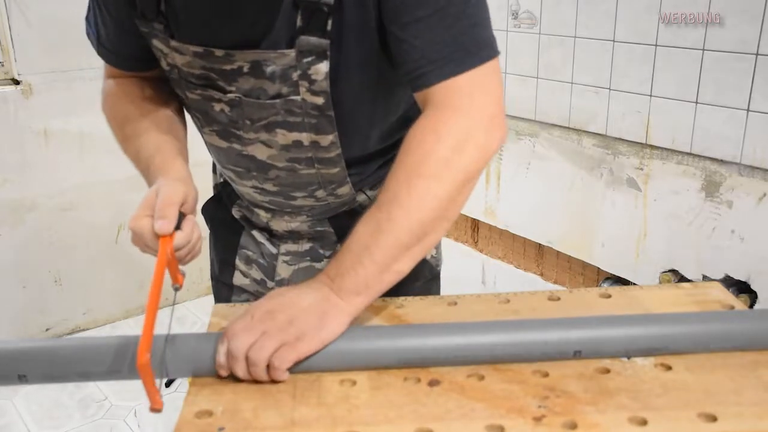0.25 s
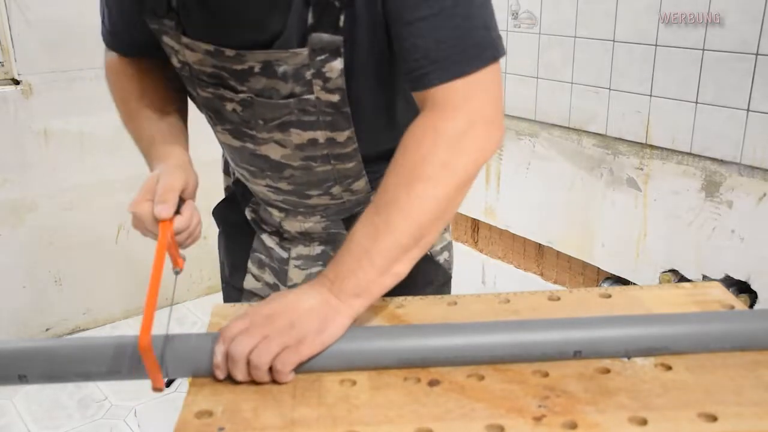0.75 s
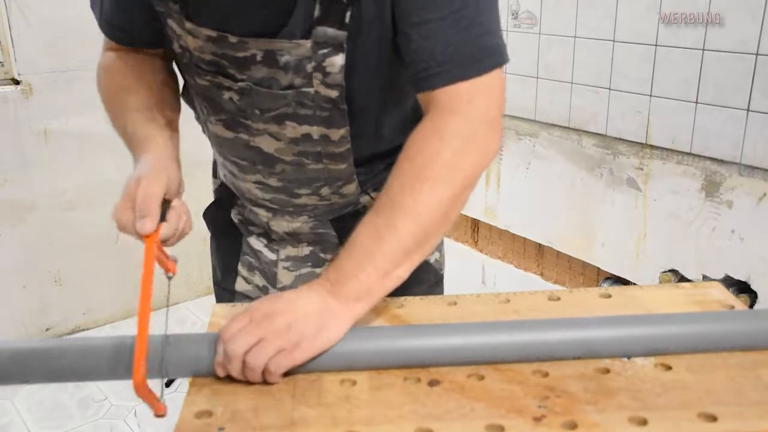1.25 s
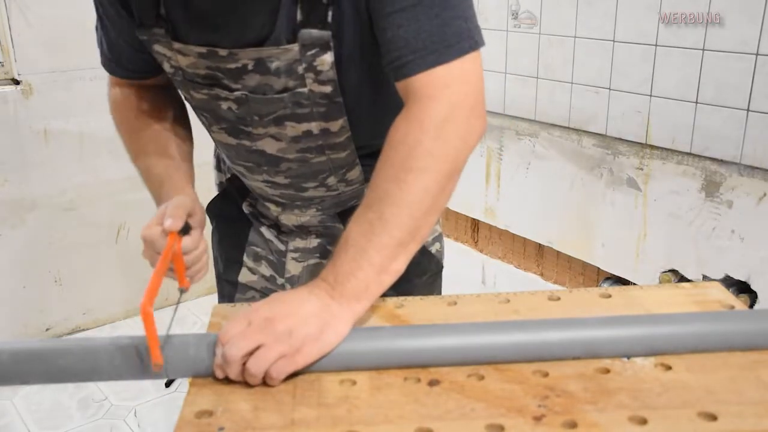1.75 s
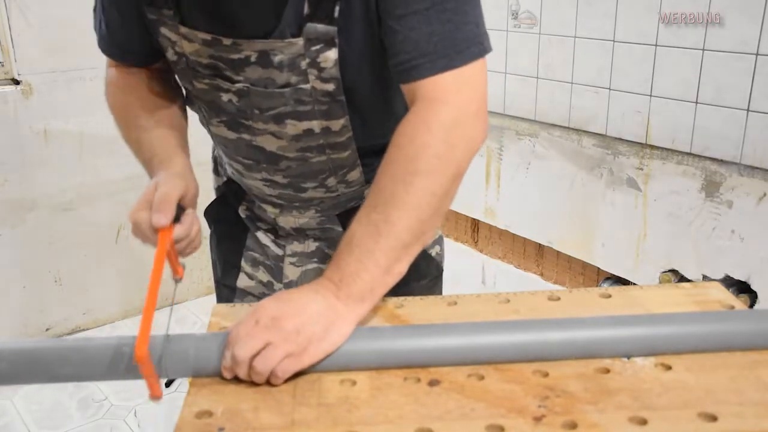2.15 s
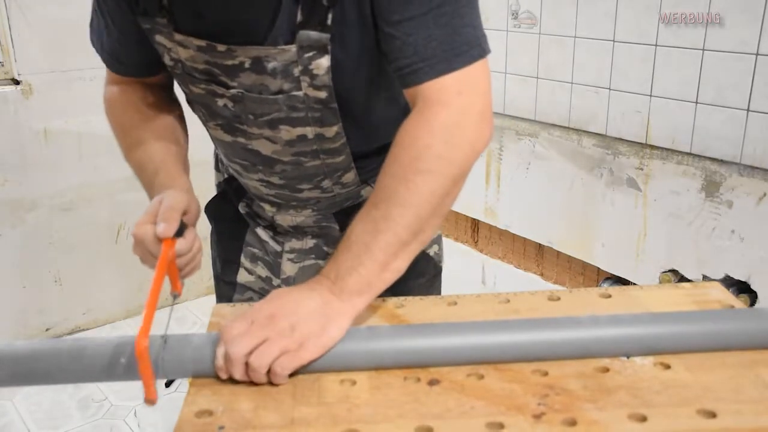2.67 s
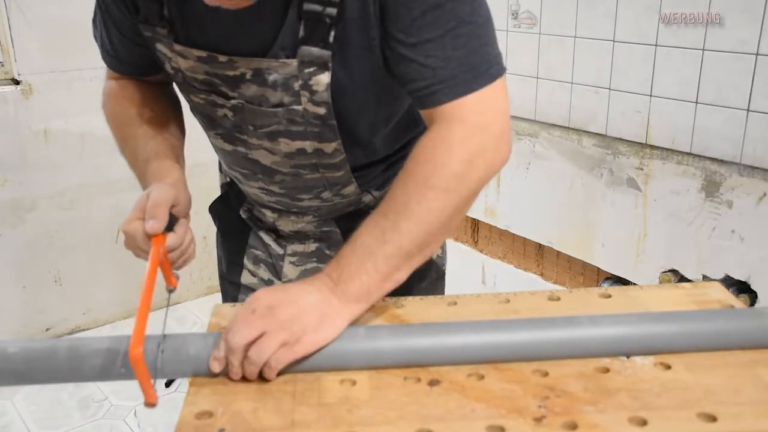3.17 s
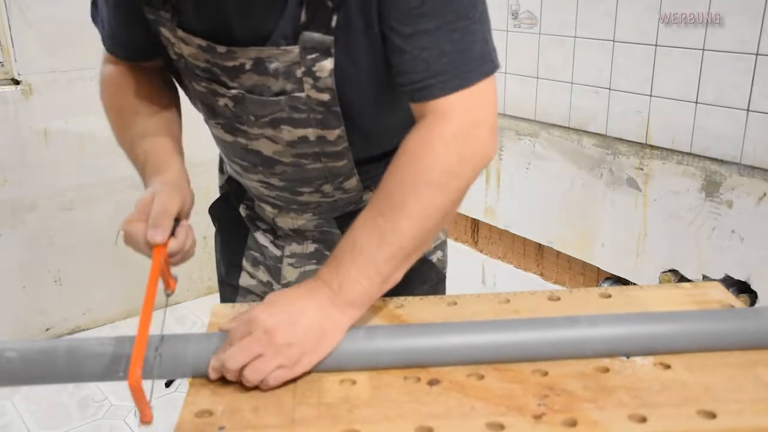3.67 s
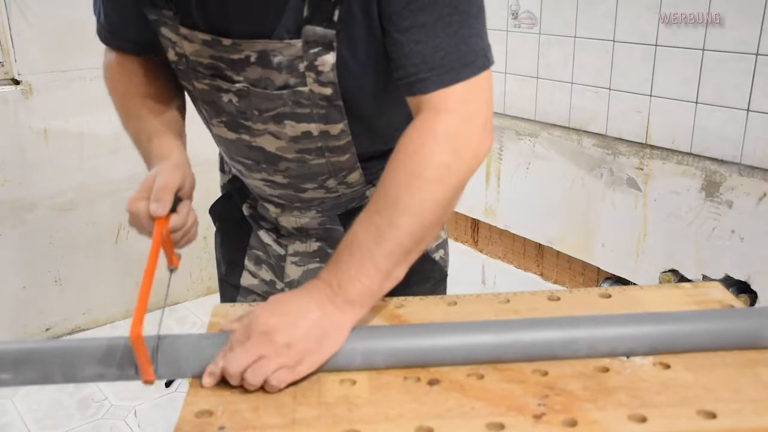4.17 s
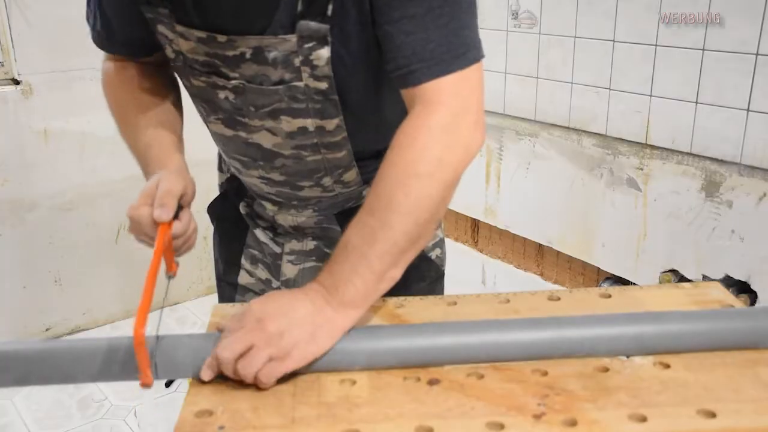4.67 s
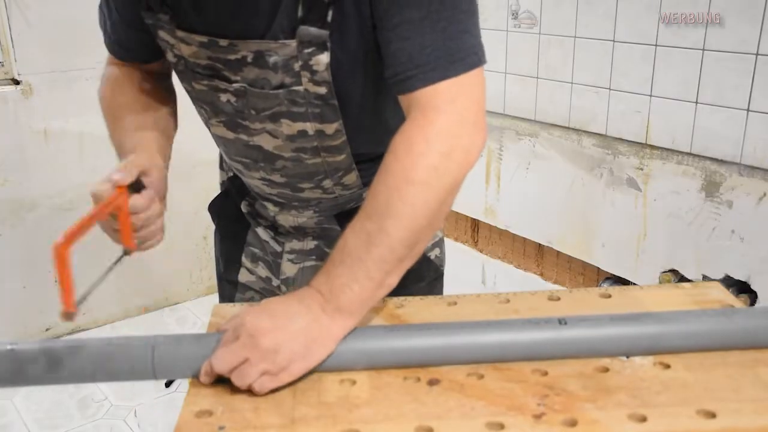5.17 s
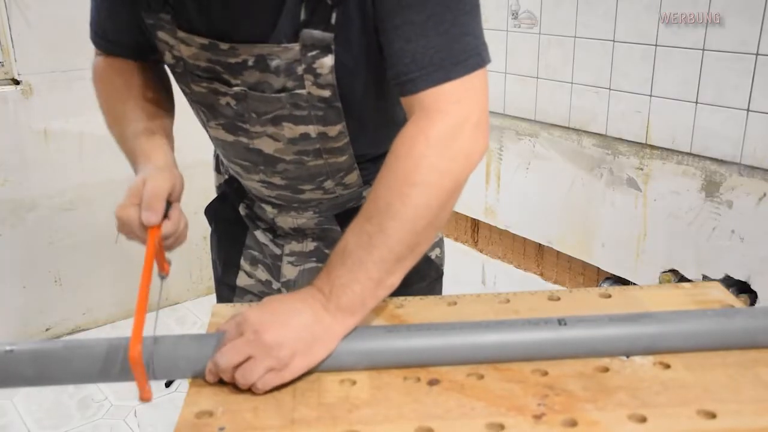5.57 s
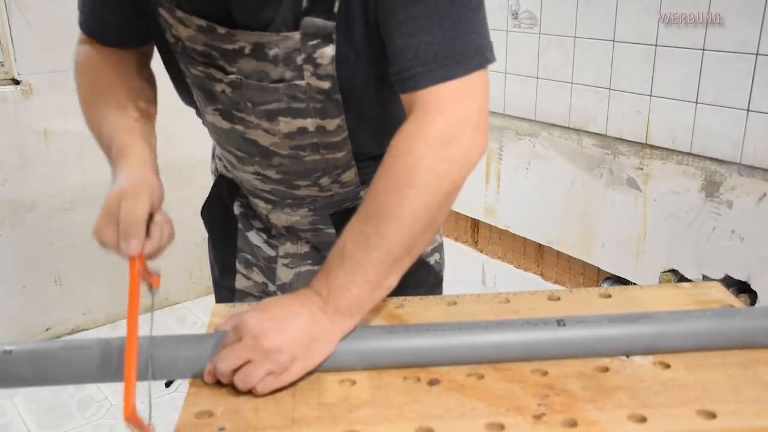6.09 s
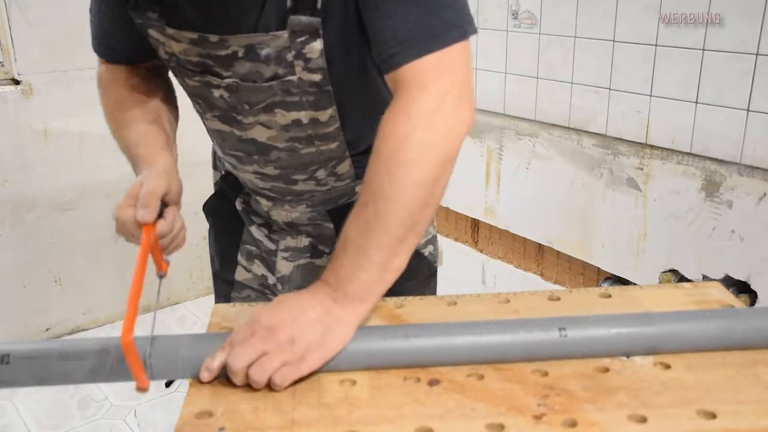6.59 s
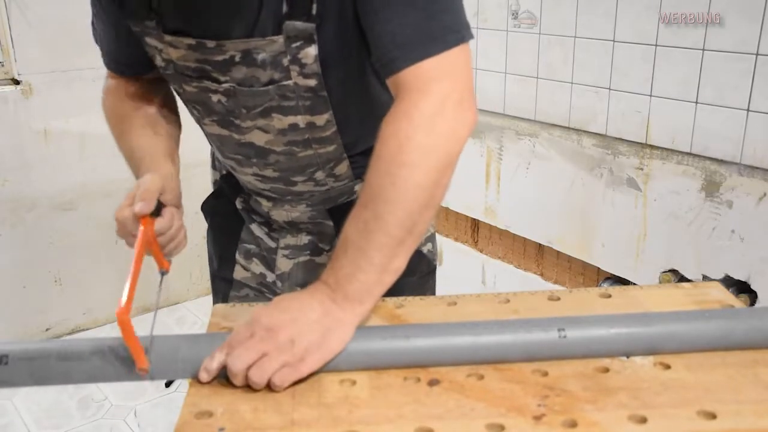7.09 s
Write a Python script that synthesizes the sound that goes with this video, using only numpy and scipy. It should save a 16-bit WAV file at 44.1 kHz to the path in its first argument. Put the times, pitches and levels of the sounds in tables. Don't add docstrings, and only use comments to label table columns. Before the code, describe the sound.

A hand hacksaw rasps in very fast, buzzing strokes through a hollow plastic pipe, with dull knocks, sharp ticks and brief pauses in a tiled room.

```python
import sys
import numpy as np
from scipy import signal
from scipy.fft import rfft, irfft, next_fast_len
from scipy.io import wavfile
from scipy.ndimage import uniform_filter1d

SR = 44100
rng = np.random.default_rng(int(sys.argv[2]) if len(sys.argv) > 2 else 0)


def how_loud(loudness_db):
    steps = np.asarray(loudness_db, float) / 20
    return 10 ** steps


def generate_wav(signal):
    frames = np.transpose(np.atleast_2d(signal))
    scaled = np.clip(frames, -1, 1) * 32767
    pcm = np.round(scaled).astype(np.int16)
    wavfile.write(sys.argv[1], SR, pcm)


N = 323694
TIME = np.arange(N) / SR


def level(x, db):
    return x * how_loud(db) / np.sqrt(np.mean(x ** 2))


def colour(x, points):
    hz, db = np.transpose(points)
    size = next_fast_len(N)
    axis_hz = np.arange(1, size // 2 + 2) * SR / size
    gain = how_loud(np.interp(np.log(axis_hz), np.log(hz), db))
    return irfft(rfft(x, size) * gain, size)[:N]


def flicker(rate, spread_db):
    targets = np.clip(rng.standard_normal(N // 100), -3, 1.5)
    return how_loud(spread_db * np.interp(TIME * rate, np.arange(N // 100), targets))


def ring(x, modes, patchy_db):
    out = np.zeros(N)
    for hz, width, db in modes:
        b, a = signal.iirpeak(hz, hz / width, SR)
        out += how_loud(db) * signal.lfilter(b, a, x * flicker(35, patchy_db))
    return out


def add(out, s, sound):
    i = int(s * SR)
    out[i:i + len(sound)] += sound[:N - i]


# frequency in Hz, density in dB per Hz.
ROOM_HISS = [(59, -59), (100, -30), (260, 5), (397, 0), (927, 0), (1220, -6), (1540, -2.5), (2260, -3),
             (2620, -3), (15900, -15)]
# frequency in Hz, rms level in dB.
HUM_LINES = [(398.4, -78.5), (1200, -82.5)]


def workshop():
    hum = sum(np.sqrt(2) * how_loud(db) * np.sin(2 * np.pi * hz * TIME) for hz, db in HUM_LINES)
    return level(colour(rng.standard_normal(N), ROOM_HISS), -70) + hum


# first bite in seconds, last bite in seconds, strokes per second.
STROKE_RUNS = [(0.011, 0.227, 27.78), (0.635, 0.878, 26.8), (0.894, 1.092, 27.88), (1.414, 1.567, 29.44),
               (1.582, 1.702, 29.24), (1.769, 1.91, 28.42), (2.15, 2.339, 26.58), (2.354, 2.589, 27.72),
               (2.661, 2.891, 28.26), (2.907, 3.08, 28.84), (3.34, 3.63, 27.56), (3.651, 3.945, 28.92),
               (4.002, 4.193, 28.78), (4.209, 4.382, 28.98), (4.472, 4.729, 29.2), (4.801, 4.991, 28.88),
               (5.038, 5.22, 27.44), (5.411, 5.641, 26.08), (5.658, 5.881, 26.82), (5.904, 6.189, 28.14),
               (6.207, 6.311, 28.94), (6.329, 6.458, 27.08), (6.587, 6.855, 27.96), (6.872, 7.156, 28.22)]
# peak in dB, every second bite in dB, swell from first to last bite in dB.
RUN_EFFORT = [(-35, -4.5, -2.5), (-37.5, -3.5, -0.5), (-39, 1, 2), (-37.5, -3, 1), (-38, 1.5, 1),
              (-38.5, 4.5, -3.5), (-39.5, -0.5, 4), (-39.5, 1.5, -1), (-39.5, -1.5, 3), (-37, -5, -0.5),
              (-37.5, 4.5, 1.5), (-35, -1, 3.5), (-34, -5, 3), (-35.5, -1.5, -1), (-36.5, -1.5, 3.5),
              (-36, 0, 2), (-35, -3, 3.5), (-34.5, -2, -1), (-37, 2, -1.5), (-35.5, -1, 5), (-35.5, 4.5, 2),
              (-34, -1.5, -5), (-33, -5.5, -4), (-34.5, -1, 0.5)]
# time of the peak in
# seconds, peak in dB, brightness in dB.
LONE_STROKES = [(0.261, -33.5, 3), (0.297, -49, 3), (0.343, -58, 9), (0.599, -50, -6), (1.156, -52, 4),
                (1.182, -58, 5), (1.352, -50.5, 4), (1.381, -50, -3), (1.737, -40.5, -6),
                (1.753, -38.5, -6), (1.925, -43.5, 1), (1.949, -43.5, -25), (2.613, -52, -7),
                (3.157, -46.5, 7.5), (3.273, -60, -7), (3.288, -43, -14), (3.303, -49.5, -11),
                (3.316, -40, -10), (4.45, -38, -15), (4.748, -45, -3), (5.39, -42.5, -9), (6.478, -41, -9),
                (6.515, -50.5, 10.5), (6.561, -35, -36), (7.218, -55, 0), (7.254, -42.5, -15),
                (7.286, -55.5, 2.5)]
# time of the peak in seconds, peak in dB,
# brightness in dB.
MORE_LONE_STROKES = [(0.249, -38.5, -13), (0.405, -64, 11), (.53, -71, -5), (.56, -60.5, -13), (1.131, -58, 11),
                     (1.25, -73, 12), (1.325, -66.5, -10), (1.993, -72, 0), (2.13, -55.5, -12), (2.632, -55, -8),
                     (3.126, -51.5, -7), (3.205, -59.5, 2), (3.236, -62.5, -3), (3.983, -46.5, -7),
                     (4.405, -52, 5), (4.428, -50, -4), (4.776, -52, -11), (5.015, -39.5, -26),
                     (5.25, -55.5, -4), (5.313, -74, 11), (6.5, -59, 3), (6.538, -60, 1), (7.181, -56, -2),
                     (7.333, -63, 0)]
PAUSE_S = 0.03
EASE_IN_DB, EASE_IN_S = -4, 0.016
EASE_OUT_DB, EASE_OUT_S = -3, 0.024
SCATTER_DB, SCATTER_S = 0.9, 0.0008


def strokes():
    rows = [np.array(LONE_STROKES), np.array(MORE_LONE_STROKES)]
    for n, (run, effort) in enumerate(zip(STROKE_RUNS, RUN_EFFORT)):
        first, last, hz = run
        peak_db, second_db, swell_db = effort
        k = np.arange(round((last - first) * 2 * hz) + 1)
        s = first + k / (2 * hz)
        starts = n > 0 and first - STROKE_RUNS[n - 1][1] > PAUSE_S
        stops = n == len(STROKE_RUNS) - 1 or STROKE_RUNS[n + 1][0] - last > PAUSE_S
        ease_db = starts * EASE_IN_DB * np.exp((first - s) / EASE_IN_S)
        ease_db = ease_db + stops * EASE_OUT_DB * np.exp((s - last) / EASE_OUT_S)
        late, hard = rng.standard_normal((2, 40))[:, k]
        db = peak_db + second_db * (k % 2) + swell_db * (k / k[-1] - 0.5)
        db = db + ease_db + SCATTER_DB * hard
        rows.append(np.transpose([s + SCATTER_S * late, db, 0 * s]))
    rows = np.concatenate(rows)
    return rows[np.argsort(rows[:, 0])].T


def bites(s, db, reach, longest_s, fullness):
    gaps = np.minimum(reach * np.diff(s, prepend=-1, append=99), longest_s)
    power = np.zeros(N)
    for at, peak_db, rise, fall in zip(s, db, 0.98 * gaps[:-1], gaps[1:]):
        span = slice(max(int((at - rise) * SR), 0), int((at + fall) * SR))
        t = TIME[span]
        away = np.where(t < at, (at - t) / rise, (t - at) / fall)
        power[span] += how_loud(2 * peak_db) * np.clip(np.cos(away * np.pi / 2), 0, 1) ** fullness
    return np.sqrt(power)


def teeth(per_s, spread_db):
    hit = rng.random(N) < per_s / SR
    hardness = np.minimum(rng.exponential(size=N), 3)
    return level(hit * rng.standard_normal(N) * how_loud(spread_db * hardness), 0)


def part(shape, push, per_s, spread_db):
    sound = shape(teeth(per_s, spread_db) * push)
    return sound * np.std(push) / np.std(sound)


# frequency in Hz, density in dB per Hz.
RASP_COLOUR = [(400, -14), (600, -4), (1280, -8.5), (2200, -5.5), (3000, -8.5), (4000, -8), (5500, -11.5),
               (7500, -7.5), (9500, -24), (16000, -22)]


def scrape(body, bright_db):
    rasp = part(lambda x: colour(x, RASP_COLOUR), body * flicker(60, 1), per_s=30000, spread_db=1)
    dull = signal.lfilter(*signal.butter(2, 3800, fs=SR), rasp)
    return dull + how_loud(0.27 * bright_db) * (rasp - dull)


# frequency in Hz, density in dB per Hz.
SIZZLE_COLOUR = [(5000, -69), (7500, -1), (9000, -9), (10300, 1.5), (12200, 2), (14000, 3.5), (15700, -1.5)]
# frequency in Hz, width in Hz, level in dB.
SHALLOW_MODES = [(5750, 1800, -2), (6210, 150, 0), (6540, 150, 2.5), (7630, 28, 2), (8400, 140, 2.5)]
# frequency in Hz, width in Hz, level in dB.
DEEP_MODES = [(9700, 120, -1), (10060, 70, 0), (10270, 90, 0), (10500, 120, -1), (10800, 70, -1),
              (11300, 100, -2), (11960, 130, 0), (12150, 110, 0), (12400, 200, -2), (13650, 70, -4),
              (14200, 200, -7)]


def blade(force, body, blade_db, bright_db, slack_db, deep):
    sharp = force * (force / np.std(force)) ** 0.2
    sizzle = part(lambda x: colour(x, SIZZLE_COLOUR), sharp * flicker(60, 1), per_s=30000, spread_db=1)
    shallow = part(lambda x: ring(x, SHALLOW_MODES, 2.2), body, per_s=20000, spread_db=1)
    buried = part(lambda x: ring(x, DEEP_MODES, 1.5), force, per_s=20000, spread_db=1)
    high_db = -1.14 + blade_db + bright_db - 0.16 * slack_db
    high = how_loud(high_db) * (how_loud(-4.5) * sizzle + how_loud(-1.5) * buried)
    return high + how_loud(bright_db - 1.5) * (1 - deep) * shallow


# frequency in Hz, width in Hz, level in dB.
FRAME_MODES = [(1650, 70, -9), (1724, 40, 0), (1780, 35, -4), (2085, 70, -8), (2280, 150, -12),
               (4505, 55, -6)]


def frame(body, frame_db, deep):
    lower = part(lambda x: ring(x, FRAME_MODES[:3], 2.2), body, per_s=8000, spread_db=1.5)
    upper = part(lambda x: ring(x, FRAME_MODES[3:], 2.2), body, per_s=8000, spread_db=1.5)
    lower_db = 1 + frame_db - 2.5 * deep
    upper_db = -2 + 1.31 * frame_db + 5 * deep
    return how_loud(lower_db) * lower + how_loud(upper_db) * upper


# frequency in Hz, width in Hz, level in dB.
PIPE_MODES = [(212, 54, -3), (293.4, 61, -0.5), (374, 250, 5.5), (447, 95, -10), (840, 1130, 0.5)]
BOOM_COLOUR = [(110, -0.5), (200, -3.5), (1000, -7), (2500, -8)]  # Hz, dB


def pipe(force, pipe_db, slack_db):
    push = signal.lfilter([0.004], [1, 0.004 - 1], force)
    boom = part(lambda x: colour(ring(x, PIPE_MODES, 3.5), BOOM_COLOUR), push, per_s=1400, spread_db=0.8)
    return how_loud(-2.5 + pipe_db + 0.44 * slack_db) * boom


# time in seconds, freedom of the pipe under the hand in dB,
# of the frame in the grip in dB, of the blade in the slot in dB, depth of the cut from 0 to 1.
CUT_PROGRESS = [(0.1, -3, -10, -2, 0.48), (.7, 2, -5.5, -0.5, 0.64), (1.0, -4, -7, -0.5, 0.28),
                (1.45, 2.5, -2.5, 1, 0.67), (1.85, -3.5, -8.5, -0.5, 0.12), (2.4, -2.5, -4, 3, .15),
                (2.75, 4, -6.5, 0.5, 0.27), (3.05, -1.5, -7, 2, 0.27), (3.35, 3, -7.5, -7.5, 0.9),
                (3.6, -6, -4, -0.5, 0.47), (3.9, -1, -10.5, 2.5, 0.47), (4.2, -0.5, -7, 1.5, 0.4),
                (4.9, -1, -11, 1.5, 0.2), (5.6, -2.5, -8.5, 2.5, 0.15), (6.0, 4, -4.5, 1.5, 0),
                (6.3, -4, -4, -2, 0.27), (6.65, 1.5, -8, 1, 0.17), (7.1, -2, -11, 2, 0)]


def saw():
    s, *columns = np.transpose(CUT_PROGRESS)
    pipe_db, frame_db, blade_db, deep = (np.interp(TIME, s, c) for c in columns)
    at, peak_db, bright_db = strokes()
    force = bites(at, peak_db, reach=0.53, longest_s=0.02, fullness=3.1)
    bright_db = np.interp(TIME, at, bright_db)
    drag = uniform_filter1d(uniform_filter1d(force, size=1500), size=1500)
    force = np.hypot(force, how_loud(-7.5) * drag)
    force_db = 20 * np.log10(uniform_filter1d(force, size=3000) + 1e-5)
    slack_db = np.clip(-37 - force_db, 0, 25)
    body = (0.6 * force + 0.4 * uniform_filter1d(force, size=900)) * flicker(220, 2.2)
    force = force * flicker(230, 2.4)
    steel = blade(force, body, blade_db, bright_db, slack_db, deep) + frame(body, frame_db, deep)
    return how_loud(-4) * scrape(body, bright_db) + steel + pipe(force, pipe_db, slack_db)


# start in seconds, peak in dB, pitch in Hz, decay by 60 dB in seconds.
BENCH_KNOCKS = [(0.2265, -13, 730, 0.017), (0.637, -29, 322, 0.027), (1.102, -35, 300, 0.054),
                (1.108, -17, 1120, 0.034), (1.183, -37.5, 350, 0.025), (3.144, -29.5, 332, 0.025),
                (3.225, -33, 700, 0.019), (2.651, -34, 240, 0.04), (2.785, -22.5, 310, 0.023),
                (3.174, -33.5, 355, 0.029), (3.666, -26, 320, 0.029), (4.398, -21, 248, 0.022),
                (5.169, -26, 448, 0.024), (5.698, -24.5, 330, 0.03), (5.766, -26.5, 384, 0.031),
                (5.948, -23.5, 387, 0.027), (5.991, -22, 282, 0.019), (6.163, -17.5, 298, 0.02),
                (6.431, -29, 346, 0.029), (7.213, -41, 240, 0.032), (7.252, -59, 290, 0.08),
                (7.287, -35, 1100, 0.016)]


def knocks():
    out, t = np.zeros(N), TIME[:int(0.12 * SR)]
    for s, db, hz, t60 in BENCH_KNOCKS:
        rattle = uniform_filter1d(rng.standard_normal(len(t)), size=12)
        fade = (1 - np.exp(-t / 0.0024)) * np.exp(-np.log(1000) * t / t60)
        body = np.sin(2 * np.pi * hz * t) + 0.66 * np.sin(2 * np.pi * 1.614 * hz * t)
        add(out, s, how_loud(db) * fade * (body * min(1, 400 / hz) ** 2 + 0.8 * rattle))
    return out


# start in seconds, peak in dB, pitch in Hz.
EDGE_TICKS = [(0.2304, -21.5, 2100), (0.2586, -19, 4460), (0.2631, -18.5, 4630), (0.3858, -29.5, 13500),
              (0.406, -36, 4100), (0.5591, -36.5, 2420), (0.625, -27.5, 2120), (0.6676, -28, 2270),
              (1.1308, -17.5, 1520), (1.154, -28, 6900), (1.2196, -37, 900), (1.3498, -52, 2270),
              (1.9907, -35, 11100), (2.146, -28.5, 2170), (3.1375, -29, 10900), (4.7962, -24.5, 12600),
              (5.3125, -41.5, 13000), (5.3856, -35, 13100), (5.4076, -23, 10800), (6.515, -25.5, 4560),
              (6.553, -32, 2040), (7.281, -38, 6940)]


def ticks():
    out, t = np.zeros(N), TIME[:int(0.04 * SR)]
    for s, db, hz in EDGE_TICKS:
        top_hz = min(1.6 * hz, 0.45 * SR)
        band = signal.butter(2, [hz / 10, top_hz], "band", fs=SR)
        crack = signal.lfilter(*band, rng.standard_normal(len(t))) * np.sqrt(SR / 2 / top_hz)
        crack = crack * np.exp(-t / (0.00049 + hz * 2.5e-7))
        ping = 0.3 * np.sin(2 * np.pi * hz * t) * np.exp(-t / 0.0015)
        add(out, s, how_loud(db) * (ping + 0.27 * crack))
    return out


# start in seconds, level in dB, start in Hz, end in Hz, length in seconds.
STEEL_SQUEAKS = [
    (1.146, -42.5, 1650, 1830, 0.028),
    (.399, -37, 12400, 11200, 0.012),
]


def squeaks():
    out, t = np.zeros(N), TIME[:int(0.04 * SR)]
    for s, db, from_hz, to_hz, length in STEEL_SQUEAKS:
        way = np.clip(t / length, 0, 1)
        turns = t * (from_hz + (to_hz - from_hz) * way / 2)
        add(out, s, how_loud(db) * np.sin(np.pi * way) ** 2 * np.sin(2 * np.pi * turns))
    return out


def scene():
    near = saw() + knocks() + ticks() + squeaks()
    t = TIME[:int(0.2 * SR)]
    tiles = rng.standard_normal(len(t)) * (t > 0.004) * np.exp(-np.log(1000) * t / 0.12)
    tail = signal.fftconvolve(near, tiles / np.sqrt(np.sum(tiles ** 2)))[:N]
    return (near + how_loud(-19) * uniform_filter1d(tail, size=3) + workshop())[None]


def band_limit(x):
    return signal.sosfilt(signal.butter(12, 16830, fs=SR, output="sos"), x)


# frequency in Hz, gain in dB.
MICROPHONE_RESPONSE = [(30, -45), (75, -34), (110, -13), (170, -3), (230, 0), (15720, 0), (15950, -55),
                       (16900, -70)]
# frequency in Hz, density in dB per Hz.
MICROPHONE_RUMBLE = [(20, 4), (60, 4), (110, -11), (200, -45)]


def record(dry):
    rumble = level(colour(rng.standard_normal(N), MICROPHONE_RUMBLE), -100)
    mix = colour(dry[0], MICROPHONE_RESPONSE) + rumble
    return band_limit(mix[None])


dry = scene()
out = record(dry)
generate_wav(out)
```